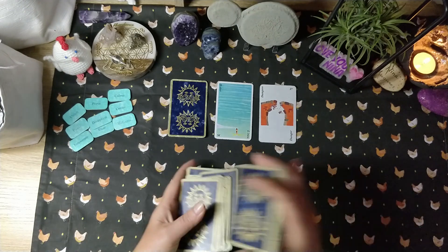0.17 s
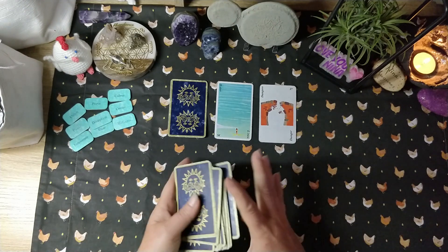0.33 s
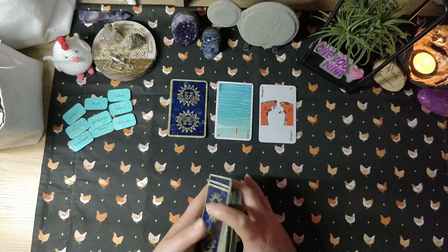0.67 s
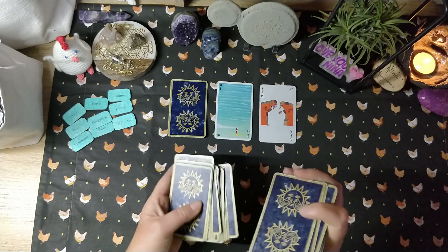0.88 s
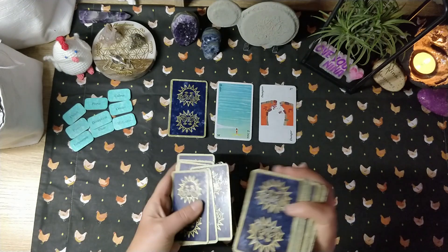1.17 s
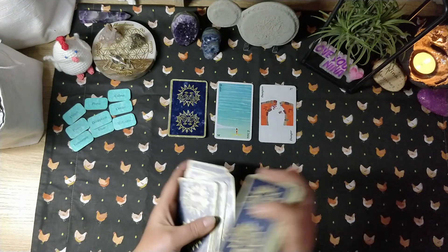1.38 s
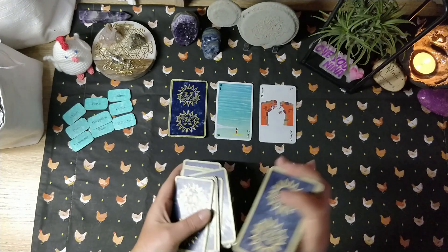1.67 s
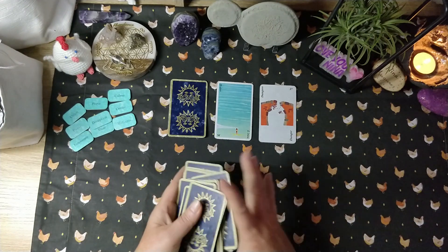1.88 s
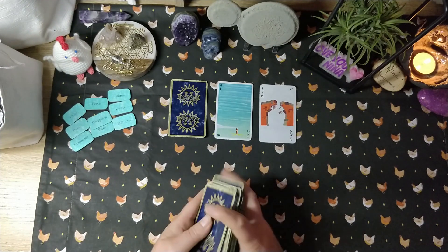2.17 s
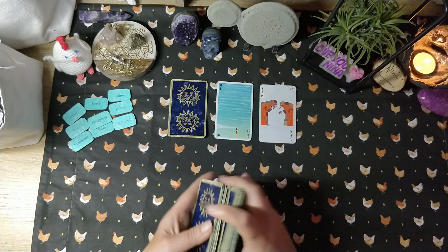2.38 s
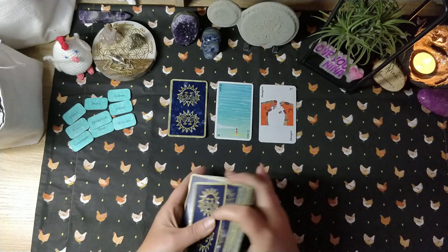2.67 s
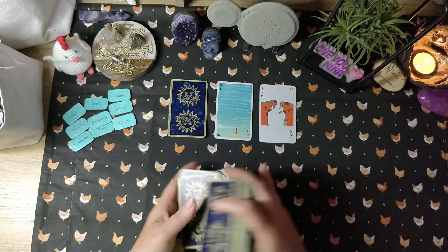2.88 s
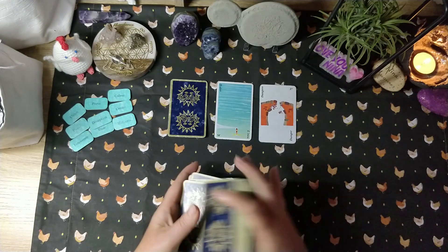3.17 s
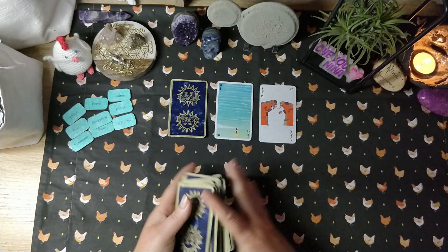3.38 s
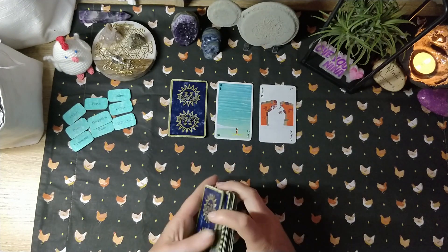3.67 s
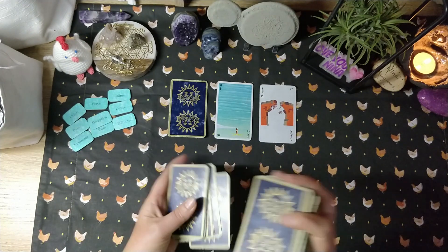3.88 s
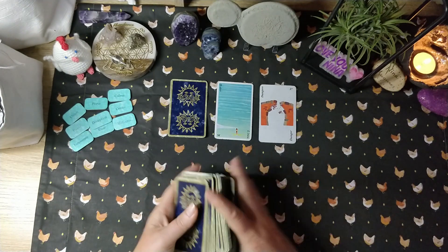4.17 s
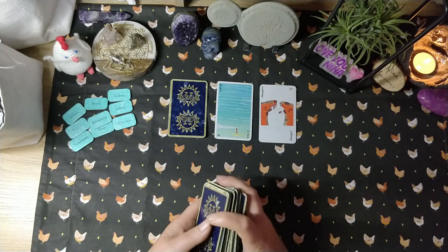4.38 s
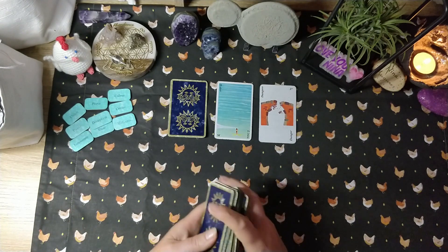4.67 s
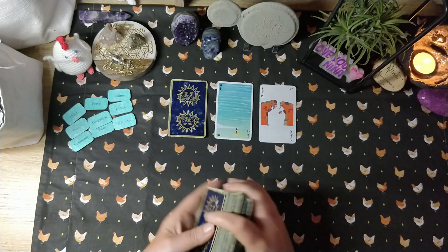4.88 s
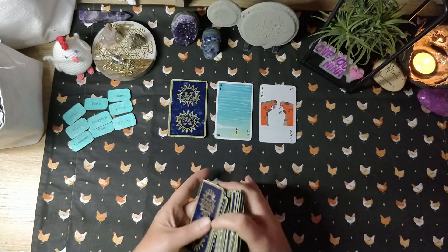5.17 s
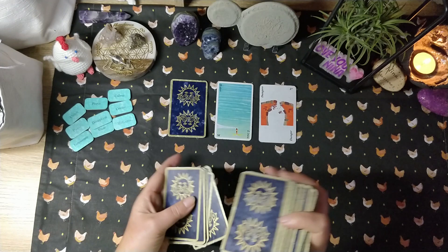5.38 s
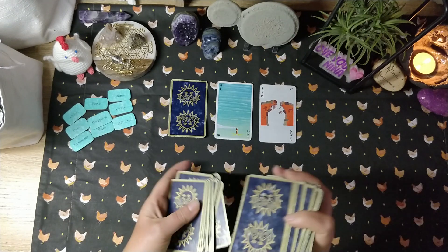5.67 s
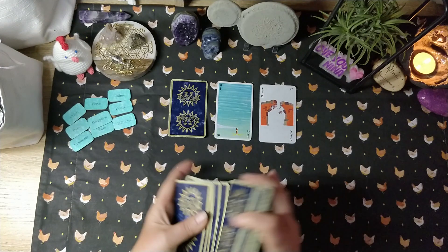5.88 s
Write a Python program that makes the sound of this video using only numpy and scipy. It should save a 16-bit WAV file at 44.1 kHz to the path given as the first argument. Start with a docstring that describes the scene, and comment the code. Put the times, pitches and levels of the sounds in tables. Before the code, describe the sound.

Close overhand card shuffling in a quiet room: packets slap onto the deck in uneven bursts, with rubbing, light taps and occasional low knocks.

```python
"""A deck of large cards, shuffled overhand above a cloth-covered table in a small room.
Close to the one microphone, packets slap onto the deck in quick clusters and ring the cupped hands.
The heaviest drops knock with a low thud. In between, cards rub over each other, edges tap, and one
edge squeaks. Farther off, the table top and the walls answer over still air and a faint hum."""
import sys
import numpy as np
from scipy import signal
from scipy.fft import rfft, irfft
from scipy.io import wavfile
from scipy.ndimage import uniform_filter1d

SR = 44100
rng = np.random.default_rng(int(sys.argv[2]) if len(sys.argv) > 2 else 0)


def wrap_up_sound(samples):
    """Save the sound to the file named by the first command line argument, as 16-bit audio."""
    columns = np.atleast_2d(samples).T
    # keep every value between -1 and 1, then stretch to whole-number steps
    tamed = np.clip(columns, -1, 1)
    steps = np.round(tamed * 32767).astype(np.int16)
    wavfile.write(sys.argv[1], SR, steps)


N = 266143


def undb(db):
    """Decibels to gain."""
    return 10 ** (np.asarray(db) / 20)

def unit(x):
    """Scale to an energy of one."""
    return x / np.sqrt(np.sum(x ** 2) + 1e-18)

def add(track, start_s, sound):
    """Mix a sound in at a time."""
    i = int(np.clip(round(start_s * SR), 0, N - 1))
    track[i:i + len(sound)] += sound[:N - i]

def bins(size):
    """Frequencies of a spectrum, clear of zero."""
    return np.maximum(np.fft.rfftfreq(size, 1 / SR), 1)

def colour_db(points, hz):
    """A spectrum read on a log-frequency axis."""
    points_hz, db = np.transpose(points)
    return np.interp(np.log(hz), np.log(points_hz), db)

def decay(t, t60_s):
    """A fade that loses 60 dB in t60_s."""
    return np.exp(-np.log(1000) * t / t60_s)

def rough_noise(size, scatter_db):
    """Noise whose level scatters from sample to sample."""
    return rng.standard_normal(size) * undb(scatter_db * rng.standard_normal(size))

def resonance_db(hz, centre_hz, db):
    """Card and skin are lossy, so their resonances are broad and never tall."""
    return np.clip(db, 0, 15) / (1 + (np.log2(hz / centre_hz) / .17) ** 4)

def ring(db):
    """Causal impulse response with the given gains."""
    cepstrum = irfft(np.log(undb(db)))
    half = len(cepstrum) // 2
    cepstrum[1:half] *= 2
    cepstrum[half + 1:] = 0
    return irfft(np.exp(rfft(cepstrum)))


# Room tone all around the microphone: frequency_hz, relative_db
AIR_SPECTRUM = [(15, -76), (33, -36), (45, -2.5), (68, -16), (102, -15.5), (161, -15.5), (293, -22.5),
                (363, -19), (503, -24.5), (695, -17.5), (800, -22), (2100, -30), (2500, -35),
                (16000, -40.5)]
# Hum in the background: pitch_hz, level_db
HUM_TONES = [(49.5, -59.5), (100, -67), (136, -66.5)]

def room_tone(air_db=-57.5, sway_points=40):
    """Still room air and a low hum that wavers slightly."""
    t = np.arange(N) / SR
    air = irfft(rfft(rng.standard_normal(N)) * undb(colour_db(AIR_SPECTRUM, bins(N))), N)
    out = unit(air) * np.sqrt(N) * undb(air_db)
    for hz, db in HUM_TONES:
        sway = 1 + .15 * np.interp(t, np.linspace(0, t[-1], sway_points), rng.standard_normal(sway_points))
        out += np.sqrt(2) * undb(db) * sway * np.sin(2 * np.pi * (hz * t + rng.random()))
    return out


def contact(contact_ms, rattle_db=-14, rattle_ms=10.8, size=1024):
    """A packet's cards land within milliseconds, a spray of tiny hits, then rattle as they settle."""
    t_ms = np.arange(size) / SR * 1000
    progress = t_ms / max(contact_ms, .5)
    envelope = np.sqrt(progress * np.exp(1 - progress))
    hits = rfft(rough_noise(size, scatter_db=2.5) * envelope ** 2)
    # the hits overlap unevenly, so each landing has shallow peaks and dips of its own
    spray = irfft(hits / np.sqrt(np.abs(hits) + 1e-12)) * envelope
    rattle = rng.standard_normal(size) ** 3 * np.minimum(progress / 2, 1) * np.exp(-t_ms / rattle_ms)
    return unit(spray) + undb(rattle_db) * unit(rattle)

# Tone of a landing, heard close: frequency_hz, relative_db
LANDING_SPECTRUM = [(60, -21.5), (200, -18.5), (400, -13.5), (700, -13), (1100, -4.5), (1800, 3.5),
                    (3200, -3.5), (4500, -2), (7000, -7), (10000, -13.5), (14500, -26.5), (17000, -29.5)]
# Bending resonances of a card: centre_hz, boost_db
FLEX_MODES = [(3000, 7), (3950, 5)]

def landing(db, contact_ms, bright_db, hollow_hz, hollow_db, focus, pivot_hz=2000, grip_db=5):
    """Cards ring the hollow of the hands and flex; edge-on landings are brighter and heavier."""
    hz = bins(2048)
    octave = np.log2(hz / pivot_hz)
    bass = (3 + 1.15 * bright_db) * np.clip(-octave / 2, 0, 1)
    treble = bright_db * np.maximum(octave, 0)
    # the grip changes from packet to packet
    flex = sum(resonance_db(hz, flex_hz, flex_db + grip_db * rng.standard_normal())
               for flex_hz, flex_db in FLEX_MODES)
    hollow = resonance_db(hz, hollow_hz, hollow_db)
    colour = colour_db(LANDING_SPECTRUM, hz) + bass + treble + focus * (hollow + flex)
    slap = signal.fftconvolve(contact(contact_ms), ring(colour))
    return unit(slap) * undb(db) * np.sqrt(.005 * SR)  # db is the rms with the energy spread over 5 ms

# Packets landing near the microphone:
# start_s, level_db, run_in_ms, contact_ms, bright_db_per_octave, hollow_hz, hollow_db
PACKETS = [(.002, -24, -2, 2.9, 2.5, 1810, 11), (0.023, -25.5, 7, 1.7, 1.5, 1980, 17),
           (.045, -16.5, 22, 2.6, 0.5, 1310, 0.5), (.056, -22, 0, 1.35, 5.5, 1400, 0),
           (.248, -15.5, 1, 0.63, 5.5, 2230, 14), (0.833, -20.5, 8.5, 1.57, 3.5, 1980, 6),
           (1.005, -28, 4.5, 3, 2, 1690, 8), (1.047, -27.5, 14, 2.2, 0.5, 1980, 10.5),
           (1.127, -13.5, 4.5, 1.76, 1.5, 1100, 15), (1.287, -17, -2, 1.34, 2.5, 1840, 15),
           (1.328, -20, -5, 1.1, 3.5, 1730, 7.5), (1.371, -16.5, 26.5, 0.73, 4, 1400, 9.5),
           (1.547, -29.5, -1.5, 2.2, 3.5, 2030, 13.5), (1.597, -26, 14.5, 2.6, -2.5, 2120, -3),
           (1.62, -27, 3, 1.9, 9.5, 1860, 26), (1.631, -14.5, 6, 0.7, -2.5, 2040, 14),
           (1.83, -20.5, 21.5, 1.9, 5, 1040, 7), (2.475, -18, 8.5, 1.2, 2.5, 3650, 14.5),
           (2.48, -18, 3, 0.85, 4, 3270, 9), (2.483, -19.5, 4, 1.5, 6, 1370, 2),
           (2.63, -15.5, 6, 0.43, -1, 1550, 4.5), (2.635, -21.5, -7.5, 1.8, 2.5, 6400, 16),
           (2.67, -18.5, -2, 0.83, -4, 3480, 6), (2.68, -20, 7, 1, 5, 2380, 15),
           (2.727, -11, 14, 2.1, 6, 2040, 9), (2.738, -21.5, -3, 1.2, 1, 2940, 10.5),
           (2.901, -21, 13.5, 1.3, 4.5, 1970, 22), (2.91, -13.5, 1.5, 1.83, -1, 2050, 10.5),
           (2.977, -20.5, 13, 2.3, 0.5, 1620, 11.5), (3.001, -26, 22, 1.2, 3.5, 1810, 9),
           (3.206, -20, 10.5, 1.2, 5, 2010, 31), (3.22, -21, 4, 1.9, 6, 1850, 7),
           (3.79, -11, 9, 0.96, -0.6, 1780, 7), (3.985, -20, 10, 0.65, -1.5, 1860, 11.5),
           (3.99, -23.5, 5, 1.3, 1, 1520, 8), (4.003, -23.5, 6, 2.1, -1, 2070, 14),
           (5.306, -13, 12, 1.32, -3.5, 3200, 1), (5.493, -23, 3, 3.5, 1, 1910, 15),
           (5.535, -25.5, 19, 0.71, 4, 1950, 21), (5.597, -19.5, 3.5, 1.53, 3.5, 1080, 11),
           (5.608, -26, -5, 2.1, -5, 2550, 20), (5.797, -26.5, 7, 1.9, 0.5, 1700, 15),
           (5.805, -19, 1.5, 0.57, 0, 1920, 18.5), (5.818, -13.5, 1.5, 0.82, -1, 2200, 8),
           (5.907, -16.5, 2.5, 0.43, 0, 1070, -8), (5.91, -13.5, -2, 1.03, 3.5, 1930, 10.5)]

def slaps(focus):
    """Packets slap onto the deck; focus scales the resonances of hands and cards."""
    out = np.zeros(N)
    for start_s, db, _, contact_ms, bright_db, hollow_hz, hollow_db in PACKETS:
        add(out, start_s, landing(db, contact_ms, bright_db, hollow_hz, hollow_db, focus))
    return out


# Tone of card rubbing on card, heard close: frequency_hz, relative_db
RUB_SPECTRUM = [(150, -7.5), (600, -5.5), (1300, 4.5), (2100, 4), (3200, 3), (5000, -2.5), (7000, -3.5),
                (10000, -11), (16000, -20)]

def rub(grain, start_s, length_s, db, bright_db, scrape_hz, skew, roundness, pivot_hz=4000):
    """One stroke over the paper grain; a skew under 1 peaks early, a roundness of 0 is flat."""
    friction = grain[max(int(start_s * SR), 0):][:max(int(length_s * SR), 8)]
    size = len(friction)
    hz = bins(size)
    tilt = bright_db * np.maximum(np.log2(hz / pivot_hz), -2)
    colour = colour_db(RUB_SPECTRUM, hz) + tilt + resonance_db(hz, scrape_hz, db=5)
    scrape = irfft(rfft(friction) * undb(colour), size)
    swell = np.abs(np.sin(np.pi * np.linspace(0, 1, size) ** skew)) ** roundness
    return unit(scrape * swell) * np.sqrt(size) * undb(db)

# Strokes of card over card in the hands: start_s, length_s, level_db, bright_db_per_octave, scrape_hz
STROKES = [(.386, 0.065, -44.5, 3.5, 3600), (0.498, .13, -51.5, 3, 4020), (0.745, 0.12, -53.5, 3.5, 4000),
           (1.003, 0.17, -43.5, 2, 1930), (1.359, 0.015, -37, 9, 1990), (1.569, 0.058, -38, 0, 2070),
           (1.83, 0.0043, -24, 18, 13000), (1.859, 0.053, -46.5, -.5, 2200),
           (2.007, 0.044, -43.5, 2.5, 2860), (2.071, .16, -54, 4.5, 2160), (2.146, 0.015, -42.5, 8, 4050),
           (2.393, 0.092, -55, 7, 4500), (2.445, 0.026, -44.5, 5, 4250), (2.469, 0.025, -44.5, -2.5, 3400),
           (2.678, 0.16, -38.5, 3.5, 2960), (2.747, 0.14, -62, 4, 8980), (2.971, 0.084, -46, 0.5, 2000),
           (3.372, 0.034, -44, 4, 2980), (3.465, 0.12, -57, 5, 3080), (3.693, 0.25, -53.5, 7.5, 2970),
           (4.16, 0.097, -47, 2, 2290), (4.257, 0.077, -50, 3, 4270), (4.43, 0.11, -54.5, 0, 2160),
           (4.507, .06, -50, 5.5, 6730), (4.631, 0.055, -48, 5, 6950), (4.759, .053, -58.5, 3.5, 7000),
           (4.83, 0.65, -55.5, 2, 4000), (4.877, 0.081, -54.5, 2.5, 2940), (4.966, 0.042, -48, 9.5, 6800),
           (5.097, .066, -48.5, 1, 2980), (5.225, 0.022, -49.5, 3, 2650), (5.246, 0.085, -51.5, 7, 2950),
           (5.575, 0.036, -34, 0.5, 2980), (5.844, 0.091, -40.5, 3, 1920)]

def slides(catch_db=3.5, catch_s=0.0059, ticks_per_s=120, tick_db=-7):
    """Card faces rub: dense paper grain that catches and slips, with ticks of passing edges."""
    out, t = np.zeros(N), np.arange(N) / SR
    paper = rough_noise(N, scatter_db=2.5)
    catching = undb(catch_db * np.interp(t / catch_s, np.arange(N), rng.standard_normal(N)))
    ticks = (rng.random(N) < ticks_per_s / SR) * rng.uniform(-0.5, 1, N)
    grain = unit(paper * catching) + undb(tick_db) * unit(ticks)
    for start_s, *stroke in STROKES:
        add(out, start_s, rub(grain, start_s, *stroke, skew=0.85, roundness=0.57))
    for land_s, db, run_in_ms, *_ in PACKETS:
        if run_in_ms > 0:  # the packet slides in before it lands
            run_s = run_in_ms / 1000
            run_in = rub(grain, land_s - run_s, run_s, db - 17,
                         bright_db=2.2, scrape_hz=2030, skew=1.65, roundness=0.16)
            add(out, land_s - run_s, run_in)
        settling = rub(grain, land_s, length_s=0.047, db=db - 28,
                       bright_db=1.7, scrape_hz=2080, skew=0.7, roundness=0.37)
        add(out, land_s, settling)
    return out


# The small room as it reaches the microphone: band_hz, early_db, tail_db, t60_s
ROOM_BANDS = [(132.4, -8, -16.5, 0.22), (406, -0.5, -12, 0.92), (997, -10, -10.5, 0.53),
              (2005, -7.5, -13, 0.47), (4860, -10.5, -14, 0.48), (9200, -9.5, -16, 0.52),
              (14100, -23, -13.5, 0.16)]

def room(x, table_s=0.0011, table_db=-9, wall_s=0.0085, early_s=0.0065, build_s=0.0066, size=26000):
    """Weak scatter from the table, a cluster of first wall echoes, then a diffuse tail."""
    t, log_hz = np.arange(size) / SR, np.log(bins(size))
    echoes = rfft(unit(rough_noise(size, scatter_db=4)) * np.sqrt(size))
    early = np.where(t > wall_s, np.exp(-(t - wall_s) / early_s), undb(table_db) * (t > table_s))
    centres = np.log([row[0] for row in ROOM_BANDS])
    response = np.zeros(size)
    for share, (_, early_db, tail_db, t60_s) in zip(np.eye(len(ROOM_BANDS)), ROOM_BANDS):
        band = irfft(echoes * np.interp(log_hz, centres, share), size)
        tail = np.clip(t / build_s - .5, 0, 1) * decay(t, t60_s)
        response += band * np.hypot(undb(early_db) * unit(early), undb(tail_db) * unit(tail))
    return signal.fftconvolve(x, response)[:N]

def shifting_echoes(x, positions=9):
    """The hands keep moving, so one pattern of echoes fades into the next."""
    place = np.linspace(0, positions - 1, N)
    fades = (np.sqrt(np.maximum(1 - np.abs(place - k), 0)) for k in range(positions))
    return sum(room(x * fade) for fade in fades)


# Modes of the deck in the cupped hands: pitch_hz, relative_db, t60_s
DECK_MODES = [(414, 4, 0.085), (388, -11.5, 0.08), (550, -7, 0.27), (599.4, 2.5, 0.063), (674.5, 4, 0.081),
              (869, 3.5, 0.1), (1049, 5, 0.084), (1085, -2.5, 0.053), (1426, 9.5, 0.047)]
# Heavy drops that shake the whole deck: start_s, knock_db, thump_db
HEAVY_DROPS = [(0.046, -51, -46), (0.25, -47, -43), (1.128, -35, -22.5), (1.289, -41.5, -36.5),
               (1.373, -44, -58), (2.729, -44, -32.5), (3.22, -50, -39.5), (3.792, -29.5, -32),
               (5.308, -37, -29), (5.599, -41, -50), (5.909, -33.5, -41)]

def drops(thump_hz=116, thump_t60_s=0.08, build_s=0.00045, detune=0.0098, size=12000):
    """A heavy packet sets the deck knocking and lands with a low thump."""
    out, t = np.zeros(N), np.arange(size) / SR
    thump = np.cos(2 * np.pi * thump_hz * t) * decay(t, thump_t60_s)
    attack = 1 - np.exp(-t / build_s)
    for start_s, knock_db, thump_db in HEAVY_DROPS:
        knock = np.zeros(size)
        for hz, db, t60_s in DECK_MODES:
            offset, phase = rng.standard_normal(2)
            cycles = hz * (1 + detune * offset) * t + phase
            knock += undb(db) * np.sin(2 * np.pi * cycles) * decay(t, t60_s)
        add(out, start_s, (undb(knock_db) * knock + undb(thump_db) * thump) * attack)
    return out


# Light taps at the edge of the deck: start_s, level_db, bright_db_per_octave
EDGE_TAPS = [(.39, -38.5, 4), (.576, -40.5, 2), (0.731, -46.5, 5), (1.871, -30.5, -1), (2.156, -42, 1),
             (2.374, -40.5, 4.5), (4.213, -44, 2), (4.231, -38.5, 1), (4.28, -44, 6), (4.321, -37, 2),
             (4.497, -38.5, 4), (4.906, -44.5, -1), (5.074, -36, 4), (5.17, -40.5, 1), (5.876, -28.5, 0)]

def taps(focus, contact_ms=2.1, hollow_hz=2075, hollow_db=3.5):
    """Single edges tap as the deck is squared or parted."""
    out = np.zeros(N)
    for start_s, db, bright_db in EDGE_TAPS:
        add(out, start_s, landing(db, contact_ms, bright_db, hollow_hz, hollow_db, focus))
    return out


# The course of one short squeak in the hands: time_s, pitch_hz, level_db
SQUEAK_GLIDE = [(3.888, 12100, -57), (3.895, 10600, -40), (3.898, 9300, -34.5), (3.903, 8200, -35.5),
                (3.908, 8050, -74)]

def squeak(waver=0.0255, smooth_samples=12):
    """Stick and slip of one edge, falling in pitch as the card slows."""
    time_s, hz, db = np.transpose(SQUEAK_GLIDE)
    t = np.arange(N) / SR
    jitter = uniform_filter1d(rng.standard_normal(N), smooth_samples) * np.sqrt(smooth_samples)
    pitch_hz = np.interp(t, time_s, hz) * (1 + waver * jitter)
    envelope = np.interp(t, time_s, undb(db), left=0, right=0)
    return np.sin(2 * np.pi * np.cumsum(pitch_hz) / SR) * envelope


def scene(wall_focus=0.48, knock_room_db=-3, squeak_room_db=-4):
    """The cards reach the microphone straight from the hands and, less coloured, by way of the walls."""
    knocks, rubs, squeal = drops(), slides(), squeak()
    direct = slaps(focus=1) + taps(focus=1) + knocks + rubs + squeal
    # the resonances are strong in one direction and weaker when summed over all
    to_walls = slaps(wall_focus) + taps(wall_focus) + rubs
    to_walls += undb(knock_room_db) * knocks + undb(squeak_room_db) * squeal
    return (direct + shifting_echoes(to_walls) + room_tone())[None]

def record(dry):
    """The microphone rounds the tallest peaks and cuts the top above 16 kHz."""
    rounded = np.tanh(0.76 * dry) / 0.83
    lowpass = signal.ellip(8, .2, 70, 16000, fs=SR, output="sos")
    return signal.sosfilt(lowpass, rounded)


dry = scene()
out = record(dry)
wrap_up_sound(out)
```